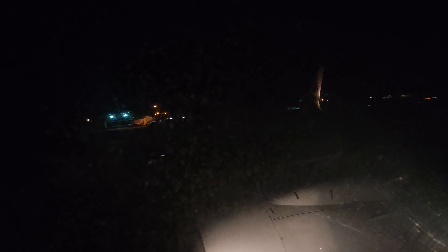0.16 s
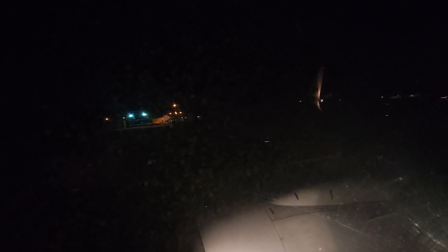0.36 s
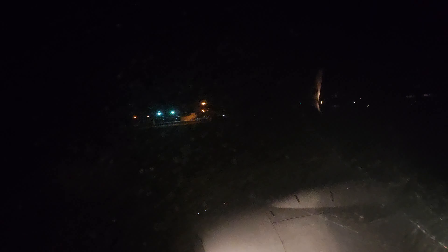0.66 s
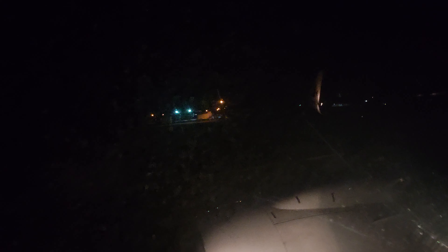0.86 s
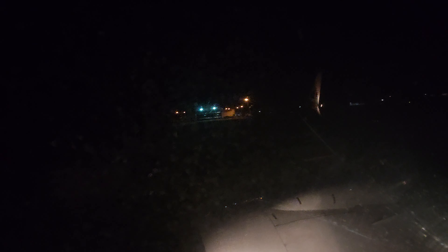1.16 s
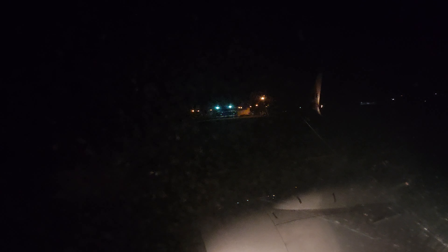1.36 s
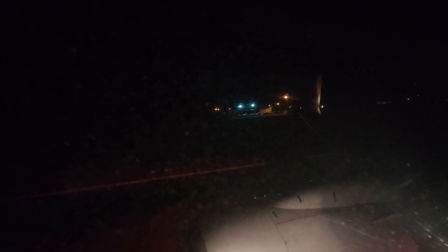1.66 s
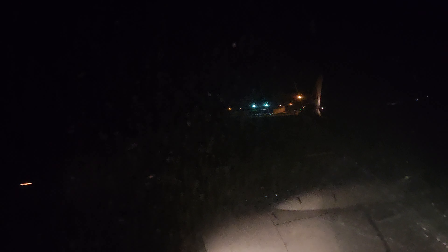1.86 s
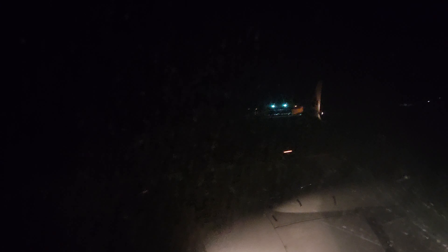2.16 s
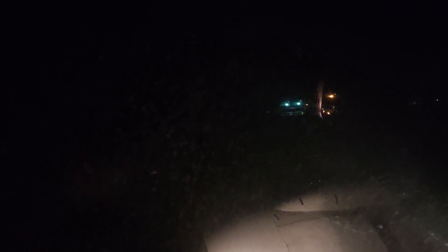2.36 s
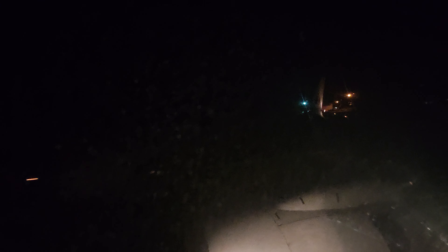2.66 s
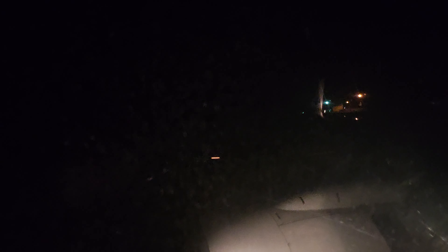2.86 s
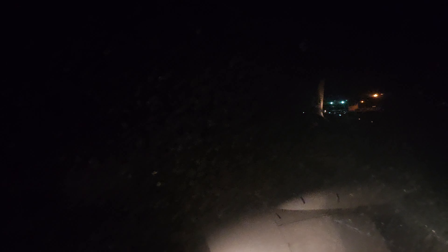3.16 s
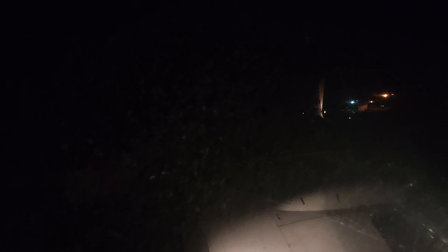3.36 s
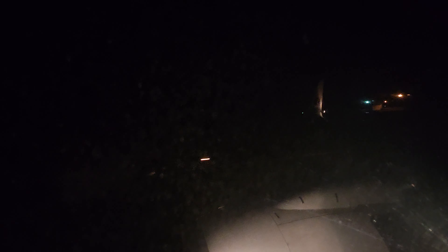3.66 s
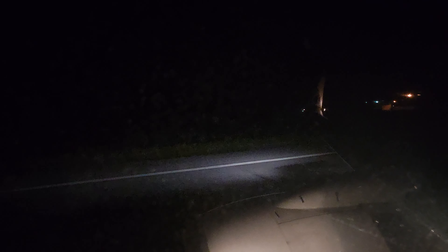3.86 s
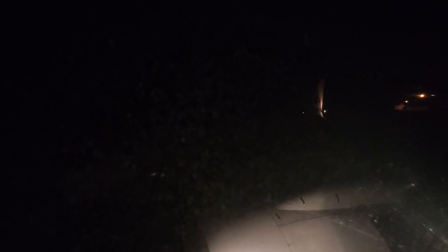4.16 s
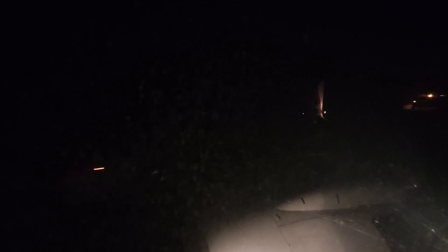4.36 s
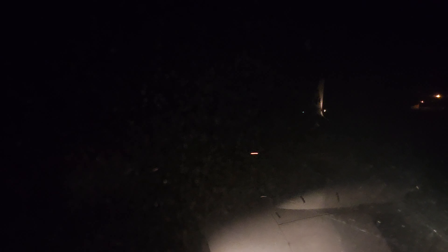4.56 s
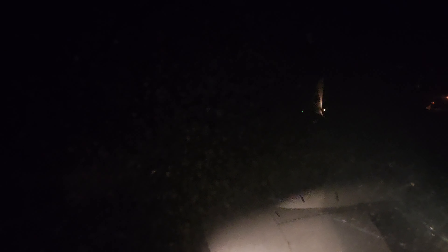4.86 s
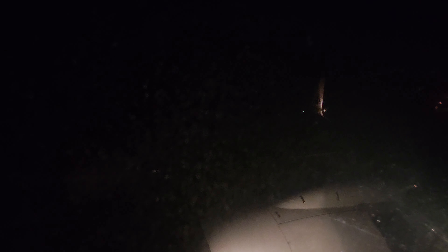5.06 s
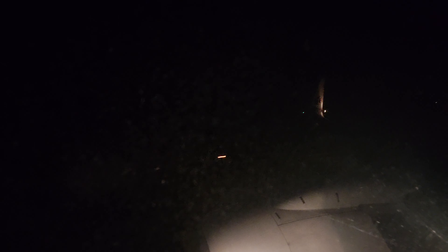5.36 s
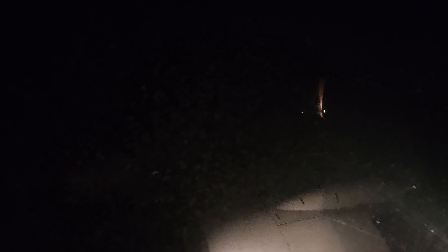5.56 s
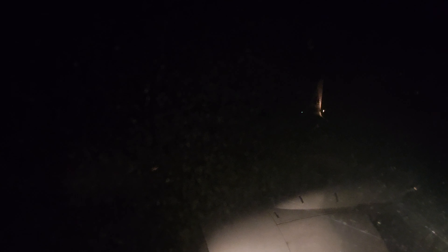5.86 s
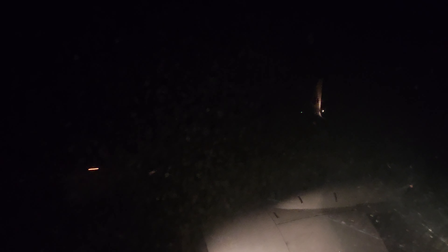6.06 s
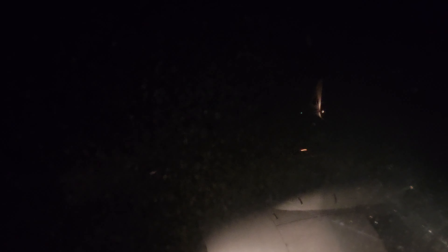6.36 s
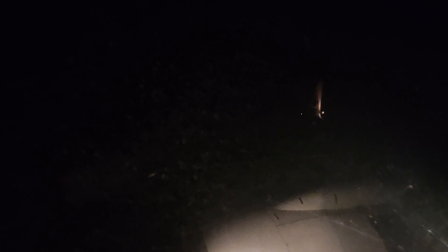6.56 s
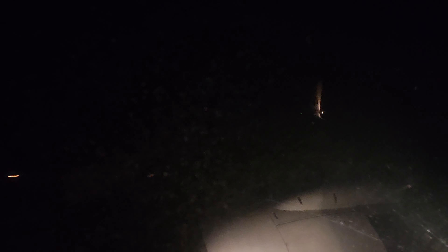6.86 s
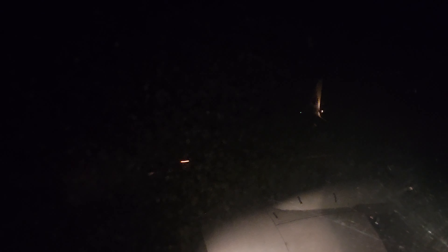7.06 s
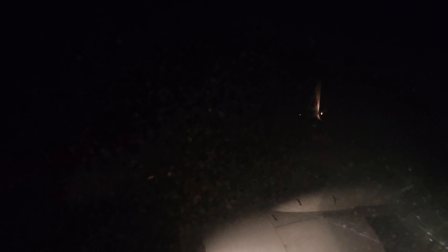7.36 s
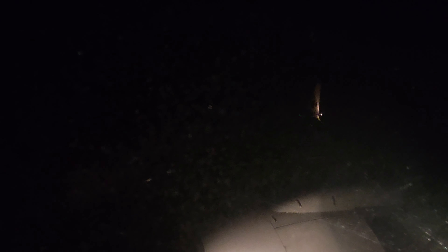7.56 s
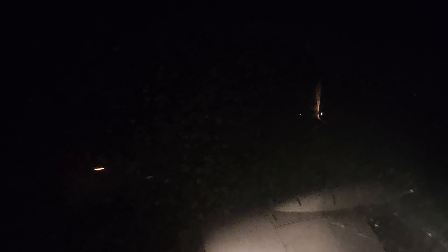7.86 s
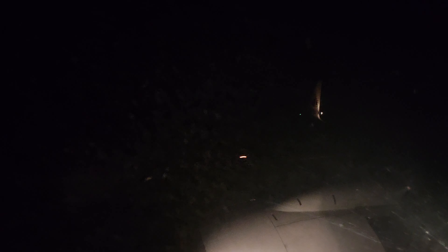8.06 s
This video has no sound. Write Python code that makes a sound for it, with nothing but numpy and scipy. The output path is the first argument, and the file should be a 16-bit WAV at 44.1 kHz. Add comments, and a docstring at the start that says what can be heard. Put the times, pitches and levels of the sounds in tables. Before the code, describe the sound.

Inside an airliner cabin, air rushes over the low hum of idling engines. Almost at once the wheels touch down with repeated deep thumps and shudders, making the trim clatter, click and squeak. A low braking roar then swells with rushing wind and the dull rattle of loose bins and seats. In the second half, the hardest buffets overload the microphone with short crackles.

```python
"""A night landing, heard from an airliner's window seat over the wing.
At first, air rushes through the cabin over the hum of idling engines. Half a second in, the wheels
touch down, thumping and shuddering along the runway and shaking the trim into clatter and squeaks.
Then the roar of braking swells, with the wash from the spoilers and a rattle of loose bins and seats.
From about four seconds on, its hardest buffets overload the microphone with short crackles."""
import sys
import numpy as np
from scipy import signal
from scipy.fft import rfft, irfft, next_fast_len
from scipy.io import wavfile
from scipy.ndimage import uniform_filter1d, minimum_filter1d

SR = 44100
rng = np.random.default_rng(int(sys.argv[2]) if len(sys.argv) > 2 else 0)


def transcribe(signal):
    """Save signal, clipped to [-1, 1], as a 16-bit WAV file at the path in sys.argv[1]."""
    frames = np.atleast_2d(signal).T
    limited = np.clip(frames, -1, 1)
    pcm = np.round(limited * 32767).astype(np.int16)
    wavfile.write(sys.argv[1], SR, pcm)


N = 361619
TIME = np.arange(N) / SR
FFT_SIZE = next_fast_len(N)
FREQS = np.maximum(np.arange(FFT_SIZE // 2 + 1) * SR / FFT_SIZE, 1)

# Table levels are relative: each layer sets its own gain in the mix.
# how alike the cabin sounds left and right: freq_hz, correlation
STEREO_LIKENESS = [(60, 0.98), (160, 0.99), (300, 0.96), (420, 0.84), (530, 0.67), (650, 0.1), (790, -0.56),
                   (1000, 0.15), (1250, .15), (1550, -0.37), (1900, -0.051), (2450, -0.0022), (3300, -.1),
                   (4400, 0.19), (5300, .05), (14000, 0)]
# the cabin's stereo balance: freq_hz, left_minus_right_db
STEREO_LEAN = [(110, -0.6), (240, 1), (380, -1), (780, -1.9), (1000, 2.5), (1200, -1.5), (1500, 2),
               (1900, -.8), (3000, 0), (3800, 2.5), (5500, .3), (10000, -0.7)]
# braking effort, as the swell of the roar: time_s, effort_db
BRAKING_EFFORT = [(0, -24.5), (.9, -23), (1.9, -21), (2.5, -19), (3.5, -17.5), (4.6, -14.8), (5.35, -11),
                  (6.2, -12.5), (7.3, -12.5), (8.2, -13)]

# hiss of vents and slipstream: freq_hz, level_db
AIR_SPECTRUM = [(200, -5), (500, 14), (680, 8.5), (900, 0), (1400, -4), (1550, -1.5), (2000, -1),
                (2800, -7), (3800, -12), (5000, -19), (6200, -19), (7100, -26), (10000, -24),
                (12000, -25.5), (14000, -32.5)]
# air duct whistles: pitch_hz, width_hz, boost_db
DUCT_MODES = [(970, 61, 4), (1218, 80, 9.5), (2037, 71, 5), (4930, 200, 6)]
# turbulent wash behind the raised spoilers: freq_hz, level_db
WASH_SPECTRUM = [(400, -15.5), (600, -9.5), (790, 1), (920, -7.5), (1380, -12.5), (1560, -12),
                 (2200, -18.5), (2900, -19.5), (3200, -21), (4800, -25), (5500, -29), (6300, -32),
                 (7000, -40), (14000, -52)]
# resonances of the wall the wash comes through: pitch_hz, width_hz, boost_db
WALL_MODES = [(792, 110, 6.5), (1006, 76, 7), (1204, 28, 8.5), (1361, 120, 10.5), (2530, 170, 5.5),
              (2830, 160, 6), (3830, 190, 4), (4650, 200, 4)]
# idling engine tone: time_s, pitch_hz, level_db
IDLE_TONE = [(0, 186, -19), (.35, 184, -27), (.55, 178, -21), (.85, 180, -20), (1.1, 181, -46),
             (1.35, 182, -25), (1.55, 186, -24.5), (1.8, 186, -18.5), (2.1, 184, -27.5), (3, 182, -27),
             (8.2, 182, -33.5)]

# chatter of the trim: freq_hz, level_db
CHATTER_SPECTRUM = [(400, -12.5), (750, 6.5), (1250, -1.5), (1600, -5.5), (2600, -9), (4500, -16.5),
                    (7000, -25.5), (9700, -24), (14000, -30.5)]
# strokes of trim rubbing on trim: crest_s, rise_s, fall_s, level_db
RUB_STROKES = [(.54, .042, .016, -36), (.665, .02, .05, -40.5), (.8, .02, .018, -41),
               (.875, .03, .04, -40.5), (1.34, .035, .02, -40.5), (2.02, .03, .025, -45),
               (2.09, .03, .03, -43), (2.33, .025, .018, -44), (2.468, .015, .025, -48),
               (2.97, .008, .015, -40), (3.002, .026, .011, -34), (3.03, .01, .02, -39.5),
               (3.061, .009, .014, -33.5)]
# scrape of those strokes: freq_hz, level_db
RUB_SPECTRUM = [(500, 7.5), (1100, 6), (1600, 3), (2700, -5), (4200, -10), (5800, -10), (7200, -26),
                (9700, -17), (14000, -25)]
# joints squeaking: start_s, pitch_hz, width_hz, level_db, rise_s, t60_s
SQUEAKS = [(.548, 3800, 1300, -35, .002, .025), (.689, 2500, 900, -34, .002, .05),
           (.704, 2400, 1000, -40.5, .004, .11), (1.035, 13600, 800, -59, .015, .25),
           (1.155, 13600, 700, -56.5, .02, .45), (2.452, 9450, 700, -52.5, .012, .17)]
# small plastic fittings clicking: start_s, level_db, t60_s
CLICKS = [(.312, -41.5, .03), (.5485, -31.5, 0.035), (.556, -38, .06), (.578, -43, .04), (.655, -41, .09),
          (1.108, -47, .05), (1.338, -42, .04), (1.385, -44, .04), (2.031, -42, .03), (2.089, -34, 0.07),
          (2.306, -44, .03), (2.415, -48, .04), (2.806, -43, 0.08), (2.885, -44, 0.15), (3.002, -38, .04),
          (3.053, -29.5, 0.035), (3.062, -31, .035), (3.108, -42, .07), (3.44, -47, .03)]
# snap of the plastic: freq_hz, level_db
CLICK_SPECTRUM = [(700, -14), (1500, 7), (4000, 2.5), (7000, -8), (9700, -7.5), (14000, -9)]
# jolts to the panels: start_s, level_db, t60_s
JOLTS = [(.495, -31, 0.09), (.547, -27, 0.045), (.689, -29.5, 0.06), (.722, -33, .04), (.781, -31.5, .08),
         (.914, -30, .05), (.927, -28, 0.05), (1.342, -25, 0.085), (2.158, -31, .05), (2.338, -26, 0.05),
         (2.963, -34, .05), (2.995, -23, 0.06), (3.003, -25, .045), (3.03, -31, .05), (3.053, -23, 0.045),
         (3.063, -21, .07), (3.107, -32, .04), (3.197, -31, .04)]
# clatter of a panel: freq_hz, level_db
PANEL_SPECTRUM = [(400, 4), (750, -17), (1000, 7), (1300, 7), (1600, -13), (2700, -6), (4500, -27),
                  (7000, -34), (14000, -43)]
# panel resonances: pitch_hz, width_hz, boost_db
PANEL_MODES = [(960, 75, 2), (1215, 150, 0), (2730, 210, 2)]
# ring of loose bins and seats: pitch_hz, level_db, t60_s
RATTLE_MODES = [(590, -0.5, 0.014), (614, -1.5, 0.026), (750, 1.5, 0.013), (905, -6, .02),
                (1010, -2.5, 0.035), (1184, -3.5, 0.045), (1350, -9, 0.0092)]

# wheels hitting the runway: start_s, hold_s, shudder_db, boom_db, chatter_db
WHEEL_BUMPS = [(0.464, 0.043, -30, -29, -36), (0.634, 0.056, -29, -15.5, -37),
               (0.825, 0.073, -18, -11, -39.5), (0.97, 0.12, -36, -15.5, -43.5),
               (1.245, 0.074, -17.5, -19, -41.5), (1.93, 0.045, -46, -15, -38.5),
               (2.086, 0.062, -18, -16, -47), (2.222, 0.04, -29, -15, -44.5), (2.436, 0.081, -32, -22, -62),
               (2.86, 0.043, -19, -15.5, -38.5), (2.963, 0.046, -20, -13.5, -34),
               (3.122, 0.056, -19, -18.5, -58), (3.422, 0.068, -32.5, -15.5, -66),
               (3.635, 0.11, -21, -30, -57.5), (3.782, 0.21, -20.5, -18.5, -63),
               (4.074, 0.32, -43.5, -16.5, -63.5), (4.59, 0.5, -34.5, -17.5, -44),
               (5.09, 0.058, -32, -9.5, -51), (5.617, 0.2, -40, -31, -42)]
# deep shudder of the airframe: freq_hz, level_db
SHUDDER_SPECTRUM = [(12, -39.5), (24, -16.5), (36, -4), (48, 13), (58, 12), (75, -1), (120, -57)]
# boom of the floor: freq_hz, level_db
BOOM_SPECTRUM = [(35, -52), (55, -21), (68, -2), (90, 0), (112, 5), (135, -7), (190, -47), (400, -79)]
# floor resonance: pitch_hz, width_hz, boost_db
FLOOR_MODE = [(114.3, 6.3, 4.5)]

# low drone of braking: freq_hz, level_db
DRONE_SPECTRUM = [(70, -35.5), (110, -15), (135, -2.5), (175, -3), (220, -3.5), (260, -21), (350, -22.5),
                  (700, -75.5)]
# brighter roar above the drone: freq_hz, level_db
ROAR_SPECTRUM = [(150, -40.5), (230, 0.5), (265, 0.5), (335, -0.5), (375, -3), (420, -5.5), (470, -11),
                 (550, -16.5), (650, -24), (900, -32), (1600, -70)]
# cabin resonances: pitch_hz, width_hz, boost_db
CABIN_MODES = [(271, 40, 2.4), (345, 20, 1.3), (402, 17, 2)]
# brief surges of the braking noise: crest_s, drone_db, roar_db
SURGES = [(.5, -40, -27), (.7, -21, -40), (1.36, -30, -22), (2.55, -17, -19), (2.98, -12.5, -39),
          (3.24, -21, -27), (3.73, -35.5, -17), (5.1, -11, -28), (5.39, -13, -14), (6.17, -10.5, -21),
          (6.57, -7, -19), (7.051, -14, -29), (7.54, -16, -13.5), (8.11, -29, -7)]
# hardest buffets in the roar: crest_s, level_db
BUFFETS = [(4.112, 1.1), (4.631, 3.1), (4.718, 3), (4.829, .8), (5.296, 1.6), (5.326, 4), (5.345, 3.7),
           (5.366, 3.6), (5.407, 2.6), (5.418, 2.1), (5.468, 1.3), (5.637, 1.7), (5.698, 1.8), (5.757, 1),
           (5.817, 3.9), (6.021, 1.5), (6.051, 2.8), (6.112, 4.2), (6.149, 4.2), (6.165, 4.9), (6.279, 3.2),
           (6.397, 2.1), (6.48, 2.7), (6.566, 1.8), (6.808, 1), (7.035, 1), (7.23, 2.7), (7.534, 3.8),
           (7.552, 1.1), (7.929, 1.1), (8.004, 1), (8.079, 2.4)]

TOUCHDOWN_S, BUMP_ATTACK_S = .5, 0.033


def from_db(db):
    """Decibels to gain."""
    return 10 ** (np.asarray(db) / 20)


def rms_one(x):
    """Scale to rms 1."""
    return x / np.sqrt(np.mean(x ** 2) + 1e-20)


def over_hz(points):
    """Draw a smooth-running curve through a table on a log-frequency axis."""
    hz, value = np.transpose(points)
    return np.interp(np.log(FREQS), np.log(hz), value)


def drift(rate_hz):
    """A random wobble, mostly slower than rate_hz; rms 1."""
    spectrum = rfft(rng.standard_normal(FFT_SIZE)) / (1 + (FREQS / rate_hz) ** 2)
    return rms_one(irfft(spectrum, FFT_SIZE)[:N])


def white():
    """Two unrelated white noises."""
    return rng.standard_normal((2, FFT_SIZE))


def colour(drive, spectrum, resonances=()):
    """EQ two unrelated drives into a stereo bed, narrow in the bass and wide above; rms 1."""
    level_db = over_hz(spectrum)
    for hz, width_hz, boost_db in resonances:
        level_db = level_db + boost_db / (1 + (2 * (FREQS - hz) / width_hz) ** 2)
    alike = np.clip(over_hz(STEREO_LIKENESS), -1, 1)
    mid, side = rfft(drive) * from_db(level_db) * np.sqrt([1 + alike, 1 - alike])
    lean = from_db(over_hz(STEREO_LEAN) / 2)
    left_right = np.array([(mid + side) * lean, (mid - side) / lean])
    return rms_one(irfft(left_right, FFT_SIZE)[:, :N])


def steady(x, span_s):
    """Level out a noise's swells that last longer than span_s."""
    power = uniform_filter1d(np.mean(x ** 2, axis=0), max(int(span_s * SR), 2))
    return x / np.sqrt(power + 1e-9)


def limit(x, ceiling):
    """Ride the gain to keep peaks near a ceiling without flattening the waves."""
    window = SR // 120
    peaks = -minimum_filter1d(-np.abs(x).max(axis=0), window)
    return x / uniform_filter1d(np.maximum(peaks / ceiling, 1), window)


def decay(start_s, t60_s):
    """An envelope that jumps to 1 and dies away."""
    out = np.zeros(N)
    at = round(start_s * SR)
    age = TIME[:min(SR // 2, N - at)]
    out[at:at + len(age)] = from_db(-60 * age / t60_s)
    return out


def braking_gain(full_db, follow, full_effort_db=-12):
    """A fader at full_db under full braking, moving by follow dB for each dB of effort."""
    time_s, effort_db = np.transpose(BRAKING_EFFORT)
    return from_db(full_db + follow * (np.interp(TIME, time_s, effort_db) - full_effort_db))


def bump_envelope(layer, t60_s):
    """Each wheel bump rises, holds and dies away in the given layer; overlaps add in power."""
    column = ("shudder", "boom", "chatter").index(layer)
    power = np.zeros(N)
    for start_s, hold_s, *levels_db in WHEEL_BUMPS:
        at = round(start_s * SR)
        age = TIME[:min(SR, N - at)]
        attack = np.minimum(age / BUMP_ATTACK_S, 1)
        release = from_db(-60 * np.maximum(age - BUMP_ATTACK_S - hold_s, 0) / t60_s)
        power[at:at + len(age)] += (from_db(levels_db[column]) * attack * release) ** 2
    return np.sqrt(power)


def surge_envelope(layer, half_width_s=0.041):
    """Brief bell-shaped swells of the drone or the roar."""
    column = ("drone", "roar").index(layer)
    return sum(from_db(levels_db[column]) * np.exp(-((TIME - crest_s) / half_width_s) ** 2)
               for crest_s, *levels_db in SURGES)


def airflow(start_db, fade_db_per_s):
    """Vents and slipstream hiss with faint duct whistles, easing off as the aircraft slows."""
    return from_db(start_db - fade_db_per_s * TIME) * colour(white(), AIR_SPECTRUM, DUCT_MODES)


def spoiler_wash(flutter_db):
    """Turbulence behind the spoilers comes through the wall, growing and surging with the braking."""
    surges = from_db(-37.5) * surge_envelope("drone")
    swell = np.hypot(braking_gain(full_db=-34, follow=0.96), surges)
    return swell * from_db(flutter_db * drift(25)) * colour(white(), WASH_SPECTRUM, WALL_MODES)


def engine_hum(waver_hz, waver_db):
    """The idling engines hold one low tone that wavers in pitch and level."""
    time_s, pitch_hz, level_db = np.transpose(IDLE_TONE)
    wavering_hz = np.interp(TIME, time_s, pitch_hz) + waver_hz * drift(9)
    tone = np.sqrt(2) * np.sin(2 * np.pi * np.cumsum(wavering_hz) / SR)
    return tone * from_db(np.interp(TIME, time_s, level_db) + waver_db * drift(7.3))


def trim_chatter(contacts_per_s, spread_db, clump_db):
    """Bumps and braking shake the trim into clumps of tiny, uneven contacts."""
    sizes = from_db(spread_db * np.minimum(rng.exponential(1, FFT_SIZE), 3))
    contacts = (rng.random(FFT_SIZE) < contacts_per_s / SR) * sizes * np.sign(white())
    shaking = np.hypot(braking_gain(full_db=-58, follow=.35), bump_envelope("chatter", t60_s=0.94))
    clumps = from_db(clump_db * drift(70))
    return shaking * clumps * colour(rms_one(contacts) + 0.18 * white(), CHATTER_SPECTRUM)


def trim_rubs(slips_per_s, spread_db, grain_db):
    """As the cabin flexes, trim parts rub in short strokes, each a grainy run of tiny slips."""
    strokes = np.zeros(N)
    for crest_s, rise_s, fall_s, level_db in RUB_STROKES:
        slope_s = np.where(TIME < crest_s, rise_s, fall_s)
        strokes += from_db(level_db) * np.exp(-((TIME - crest_s) / slope_s) ** 2)
    sizes = from_db(spread_db * np.clip(rng.standard_normal(FFT_SIZE), -2, 1))
    slips = (rng.random(FFT_SIZE) < slips_per_s / SR) * sizes * np.sign(white())
    return strokes * from_db(grain_db * drift(150)) * colour(slips, RUB_SPECTRUM)


def joint_squeaks():
    """Tight joints slip with a narrow squeak of noise that swells and dies away."""
    out = np.zeros((2, N))
    for start_s, hz, width_hz, level_db, rise_s, t60_s in SQUEAKS:
        band = signal.butter(2, [hz - width_hz / 2, hz + width_hz / 2], "band", fs=SR, output="sos")
        stroke = uniform_filter1d(decay(start_s + rise_s / 2, t60_s), int(rise_s * SR))
        out += from_db(level_db) * stroke * rms_one(signal.sosfilt(band, white()[:, :N]))
    return out


def fitting_clicks(gain_db):
    """Plastic fittings click: a sharp snap on top of a short, bright tail."""
    snaps = sum(from_db(level_db + gain_db) * (decay(start_s, t60_s) + decay(start_s, t60_s / 6))
                for start_s, level_db, t60_s in CLICKS)
    return snaps * colour(white(), CLICK_SPECTRUM)


def panel_knocks(gain_db, rough_db, attack_s):
    """Each jolt sets a panel clattering unevenly for a moment."""
    jolts = sum(from_db(level_db + gain_db) * decay(start_s, t60_s) for start_s, level_db, t60_s in JOLTS)
    pole = np.exp(-1 / (attack_s * SR))
    softened = signal.lfilter([1 - pole], [1, -pole], jolts + 1e-18)
    return softened * from_db(rough_db * drift(120)) * colour(white(), PANEL_SPECTRUM, PANEL_MODES)


def bin_rattles(hits_per_s, spread_db, buffet_boost_db):
    """Under braking, loose bins and seats give dull knocks at random and harder ones at each buffet."""
    hits = (rng.random(N) < hits_per_s / SR) * from_db(spread_db * np.clip(rng.standard_normal(N), -2, 1))
    for crest_s, level_db in BUFFETS:
        hits[round(crest_s * SR)] += from_db(buffet_boost_db + level_db)
    at = np.flatnonzero(hits)
    ringing = np.zeros((2, N))
    for hz, level_db, t60_s in RATTLE_MODES:
        drive = np.zeros((2, N))
        # every hit rings the modes in a different blend
        drive[:, at] = hits[at] * rng.choice([-1, -0.83, 0.75, 0.97], (len(at), 2)).T
        radius, angle = from_db(-60 / (t60_s * SR)), 2 * np.pi * hz / SR
        resonator = [1, -2 * radius * np.cos(angle), radius ** 2]
        ringing += from_db(level_db) * signal.lfilter([1, 0, -1], resonator, drive + 1e-18)
    dulled = signal.sosfilt(signal.butter(2, 1600, fs=SR, output="sos"), ringing)
    return braking_gain(full_db=-41, follow=1.3) * rms_one(dulled)


def wheels(airborne_db, roll_db, fade_db_per_s):
    """Rolling and bumps come up the gear: the airframe shudders, and the floor booms more with braking."""
    on_ground = np.clip((TIME - TOUCHDOWN_S) / BUMP_ATTACK_S, 0, 1)
    rolling = from_db(airborne_db) + on_ground * from_db(roll_db - fade_db_per_s * TIME)
    shudder_bumps = from_db(-3.5) * bump_envelope("shudder", t60_s=0.22)
    boom_bumps = from_db(-1.0) * bump_envelope("boom", t60_s=0.6)
    wheel_load = braking_gain(full_db=-21, follow=0.39)
    shudder = steady(colour(white(), SHUDDER_SPECTRUM), span_s=0.18)
    boom = steady(colour(white(), BOOM_SPECTRUM, FLOOR_MODE), span_s=0.14)
    return np.hypot(rolling, shudder_bumps) * shudder + np.hypot(wheel_load, boom_bumps) * boom


def braking_roar():
    """Braking builds a low drone, then a brighter roar that rings the cabin; both surge."""
    drone_gain = np.hypot(braking_gain(full_db=-11.5, follow=0.7), surge_envelope("drone"))
    roar_gain = np.hypot(braking_gain(full_db=-11.5, follow=0.96), surge_envelope("roar"))
    drone = steady(colour(white(), DRONE_SPECTRUM), span_s=0.17)
    roar = steady(colour(white(), ROAR_SPECTRUM, CABIN_MODES), span_s=.15)
    return drone_gain * drone + roar_gain * roar


def buffeted(rumble, centre_hz, merge_s):
    """In a buffet the rumble gathers into one big swing of pressure with a rebound on either side."""
    out = rumble.copy()
    offsets = np.arange(-(SR // 80), SR // 80)
    duck = 1 - 0.62 * np.exp(-(offsets / SR / merge_s) ** 4)
    for crest_s, level_db in BUFFETS:
        detune_db, polarity = rng.normal(0, .35, 2)
        phase = np.pi * centre_hz * from_db(detune_db) * offsets / SR
        swing = (1 - 2 * phase ** 2) * np.exp(-phase ** 2)
        at = round(crest_s * SR) + offsets
        out[:, at] = out[:, at] * duck + np.sign(polarity) * from_db(level_db) * swing
    return out


def scene():
    """The mix surrounds the seat; the wheels lean a little to the right."""
    rumble = wheels(airborne_db=-49.5, roll_db=-30.5, fade_db_per_s=2) * from_db([[-.6], [.6]])
    rumble += engine_hum(waver_hz=7, waver_db=2.3) + braking_roar()
    rumble = buffeted(limit(rumble, ceiling=1.1), centre_hz=185, merge_s=.0028)
    interior = trim_chatter(contacts_per_s=2200, spread_db=1.8, clump_db=1.3)
    interior += trim_rubs(slips_per_s=1100, spread_db=3, grain_db=2.2)
    interior += panel_knocks(gain_db=-4.1, rough_db=1.0, attack_s=0.0016)
    interior += fitting_clicks(gain_db=-2.5) + joint_squeaks()
    interior += bin_rattles(hits_per_s=30, spread_db=2, buffet_boost_db=2.5)
    air = airflow(start_db=-35.5, fade_db_per_s=0.76) + spoiler_wash(flutter_db=0.65)
    return air + interior + rumble


def record(dry):
    """The microphone clips the biggest swings flat; the deepest bass and the top are cut."""
    clipped = dry / (1 + (np.abs(dry) / .93) ** 24) ** (1 / 24)
    edge_fades = np.minimum(np.minimum(TIME, TIME[::-1]) / .004, 1)
    low_cut = signal.butter(1, 8, "high", fs=SR, output="sos")
    high_cut = signal.ellip(10, .1, 80, 14000, fs=SR, output="sos")
    return signal.sosfilt(high_cut, signal.sosfilt(low_cut, clipped * edge_fades))


dry = scene()
out = record(dry)
transcribe(out)
```